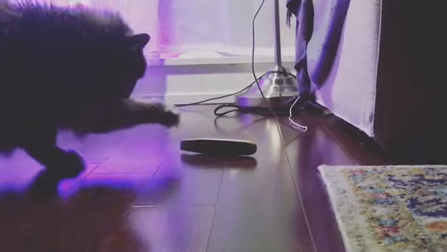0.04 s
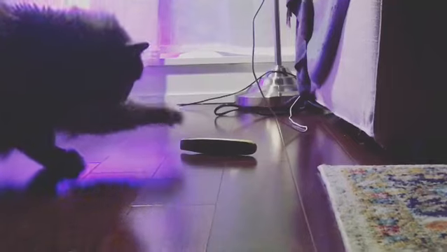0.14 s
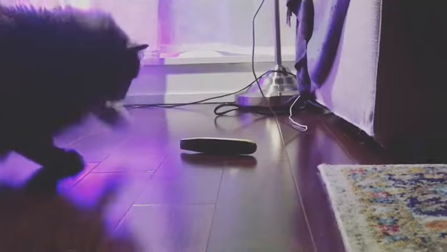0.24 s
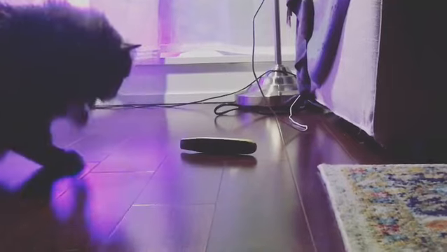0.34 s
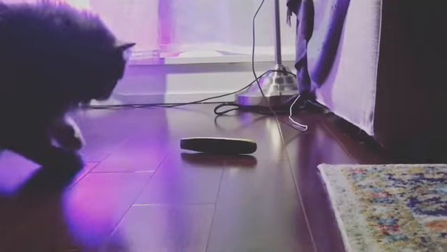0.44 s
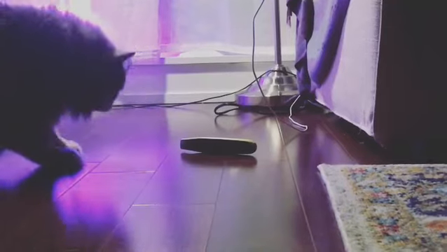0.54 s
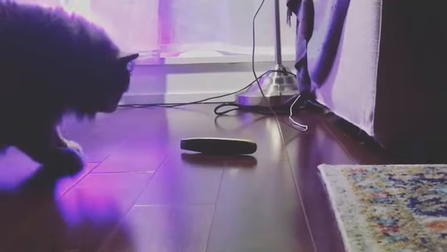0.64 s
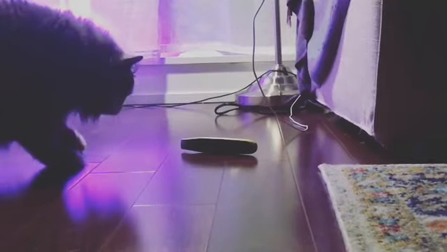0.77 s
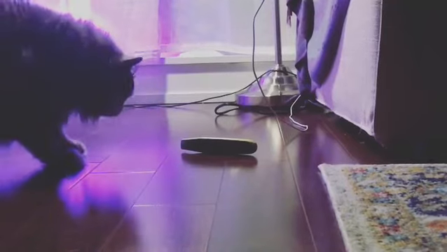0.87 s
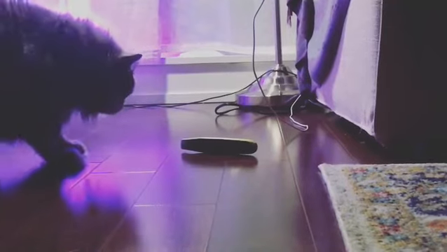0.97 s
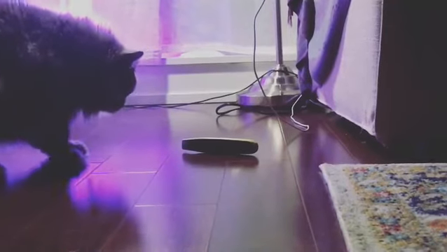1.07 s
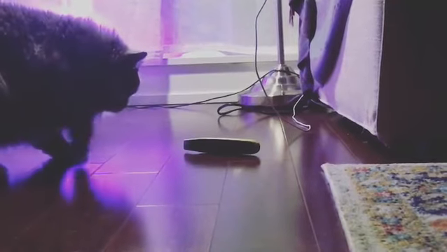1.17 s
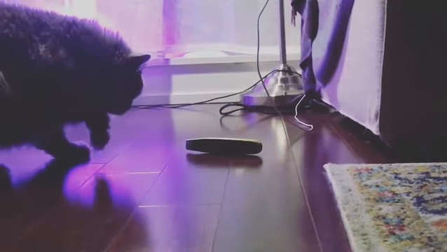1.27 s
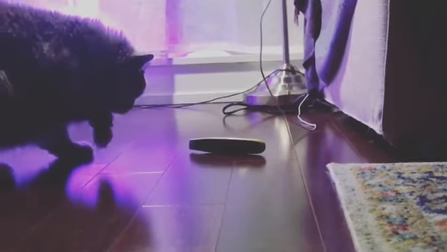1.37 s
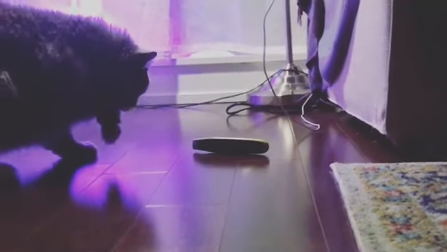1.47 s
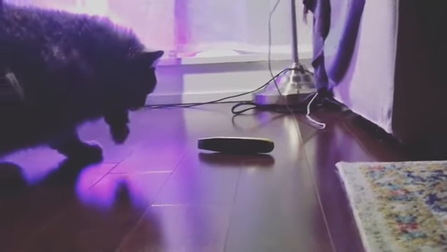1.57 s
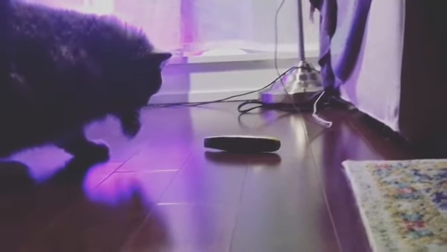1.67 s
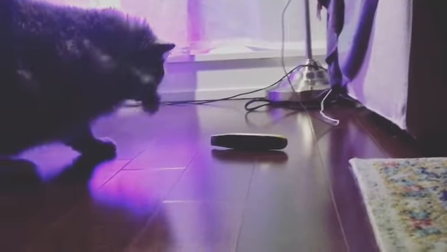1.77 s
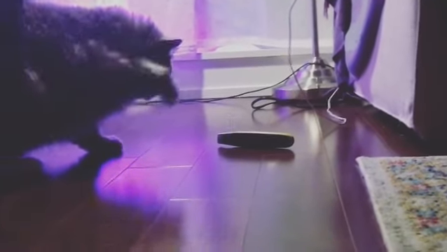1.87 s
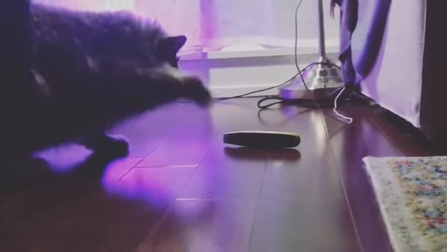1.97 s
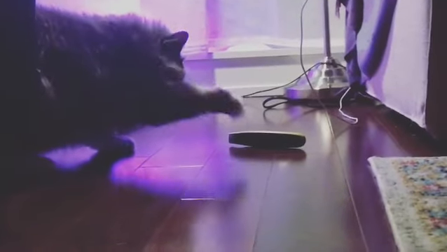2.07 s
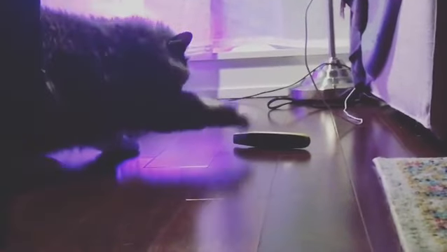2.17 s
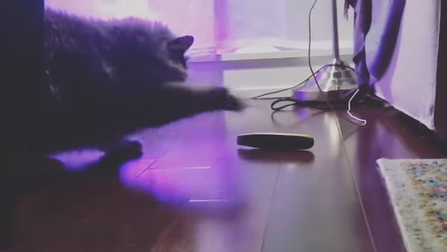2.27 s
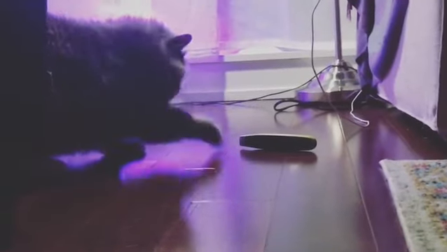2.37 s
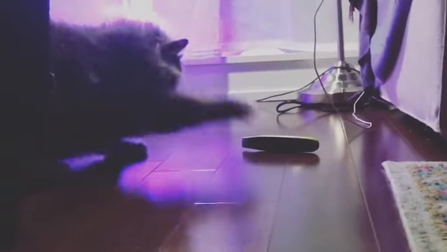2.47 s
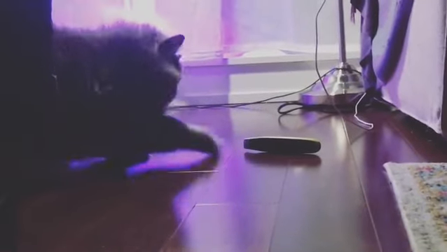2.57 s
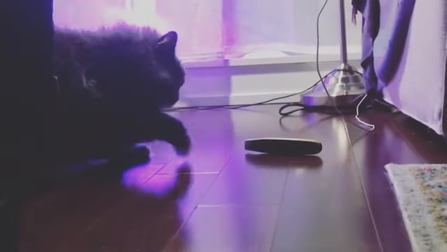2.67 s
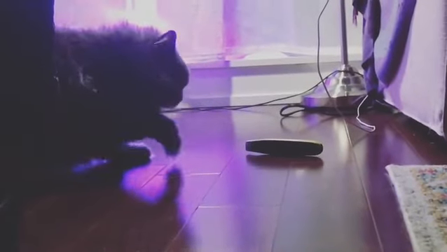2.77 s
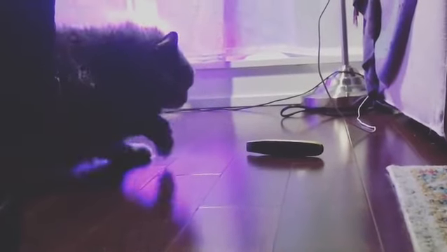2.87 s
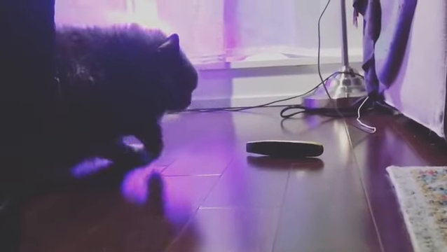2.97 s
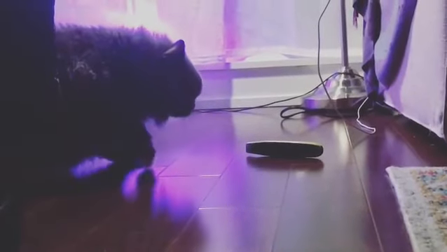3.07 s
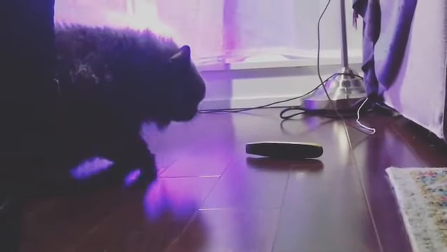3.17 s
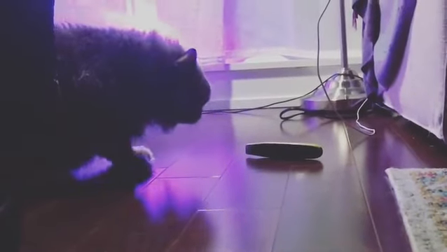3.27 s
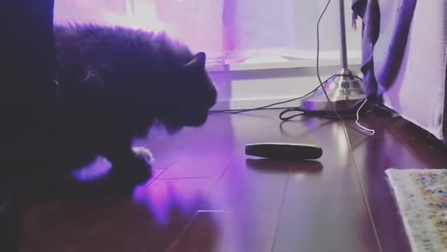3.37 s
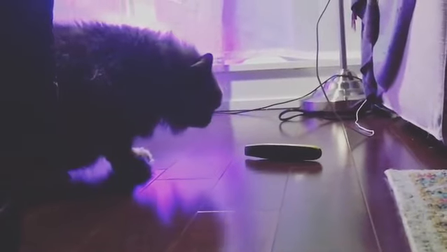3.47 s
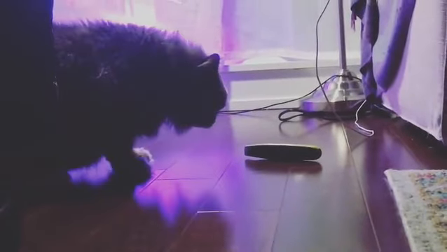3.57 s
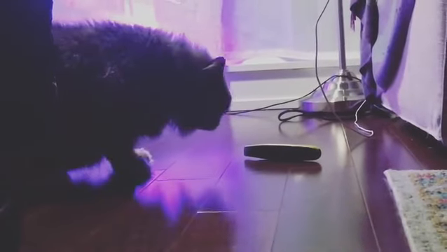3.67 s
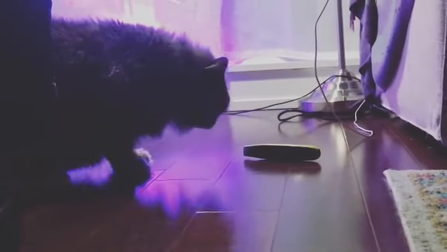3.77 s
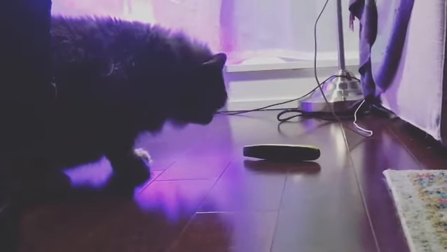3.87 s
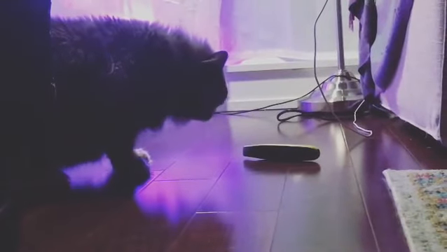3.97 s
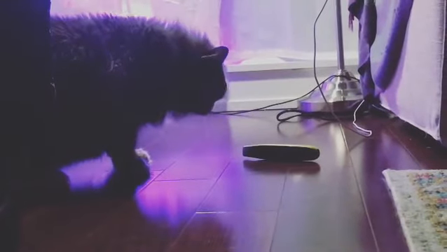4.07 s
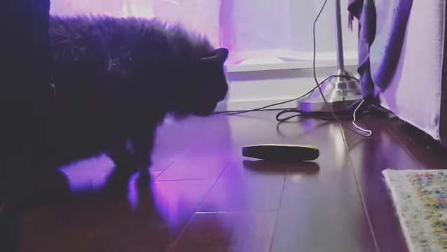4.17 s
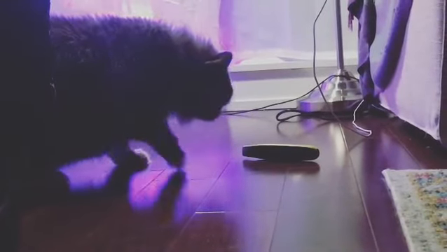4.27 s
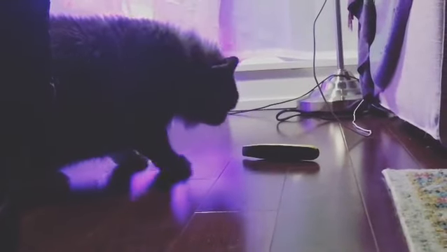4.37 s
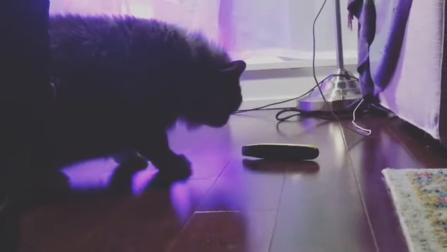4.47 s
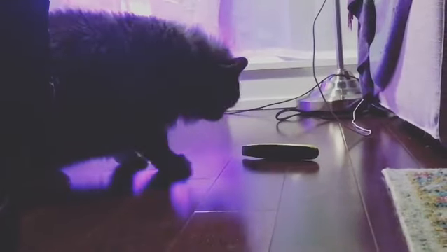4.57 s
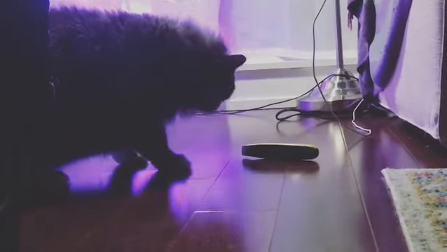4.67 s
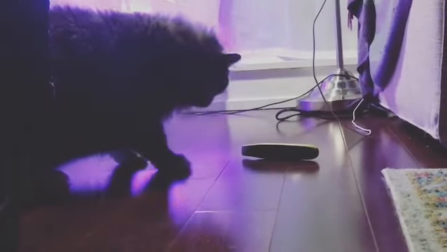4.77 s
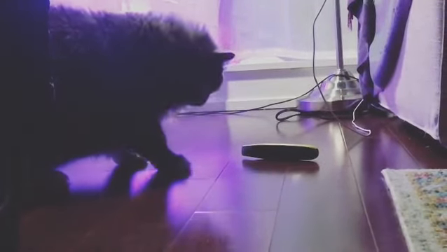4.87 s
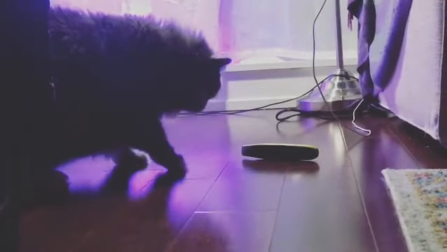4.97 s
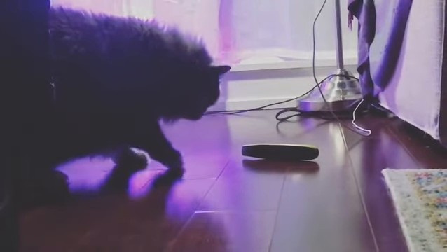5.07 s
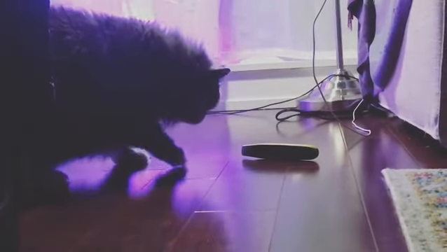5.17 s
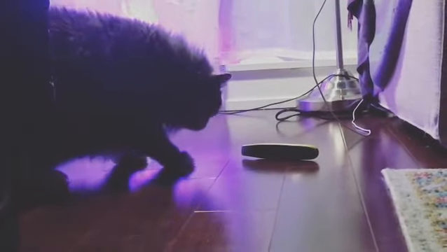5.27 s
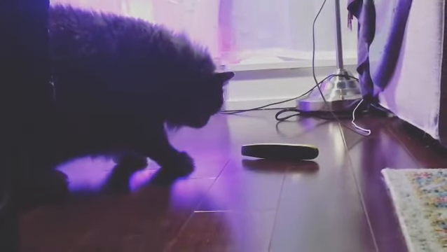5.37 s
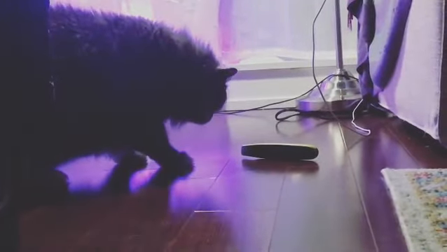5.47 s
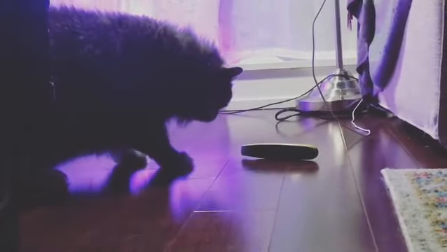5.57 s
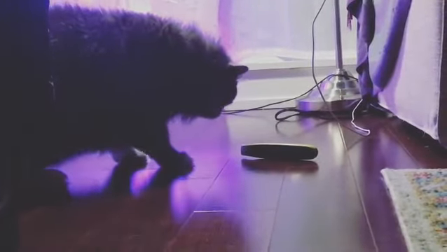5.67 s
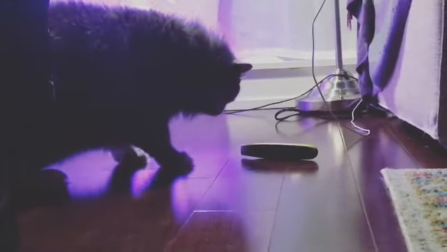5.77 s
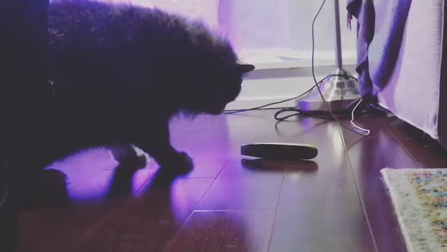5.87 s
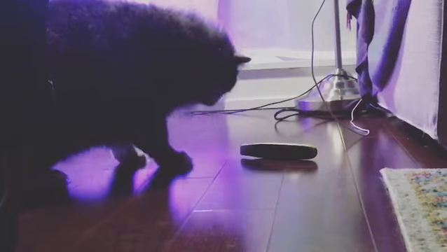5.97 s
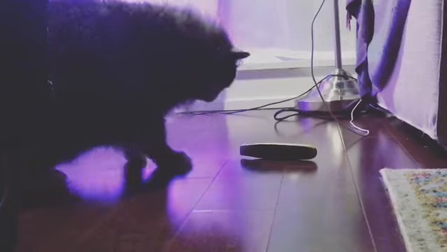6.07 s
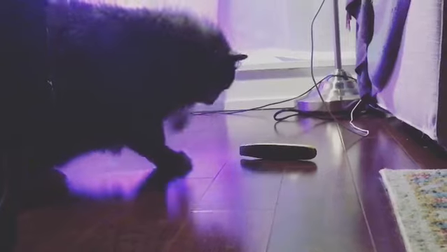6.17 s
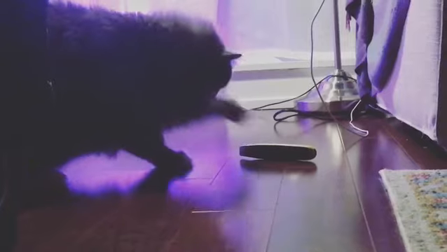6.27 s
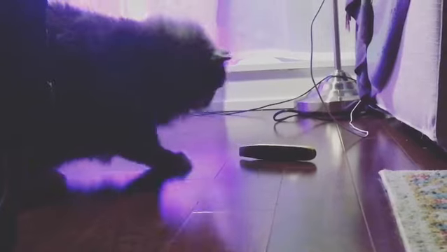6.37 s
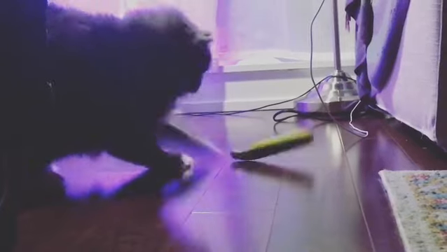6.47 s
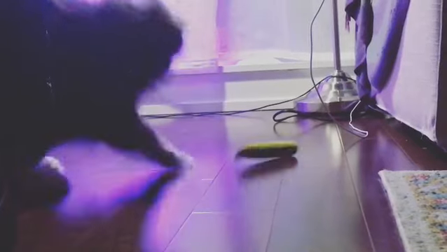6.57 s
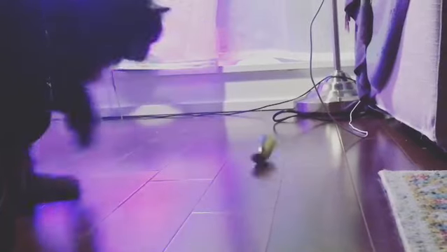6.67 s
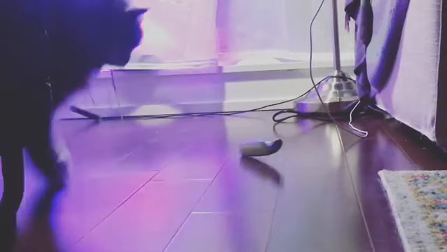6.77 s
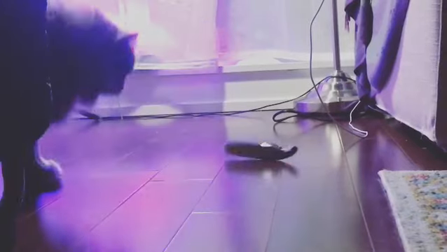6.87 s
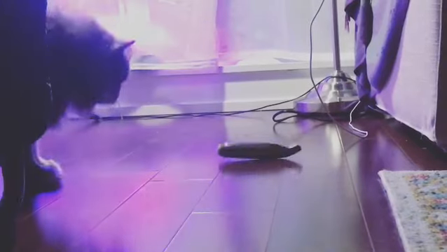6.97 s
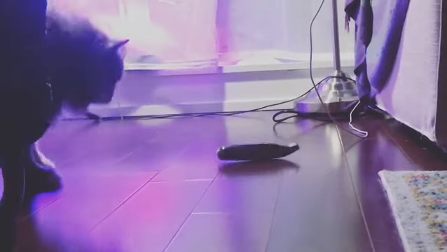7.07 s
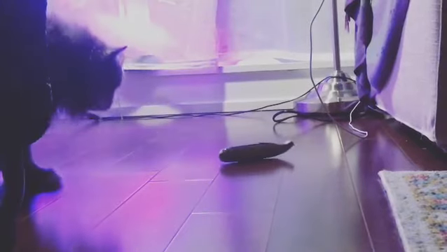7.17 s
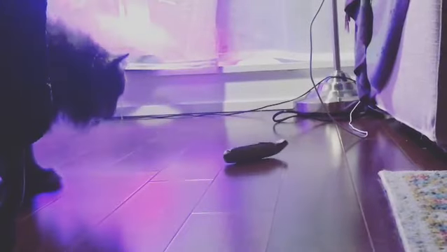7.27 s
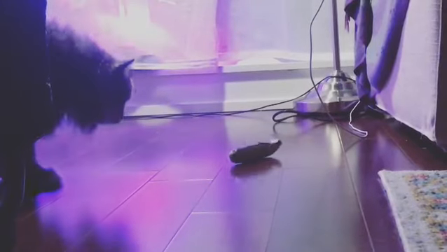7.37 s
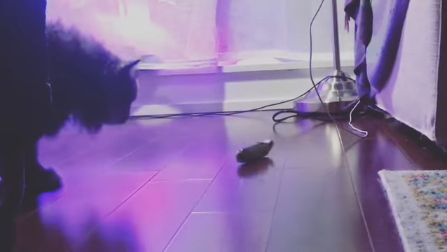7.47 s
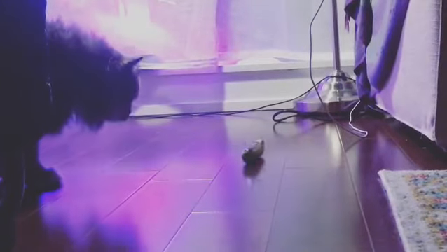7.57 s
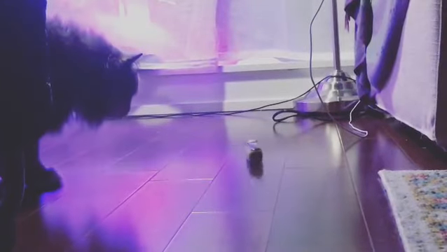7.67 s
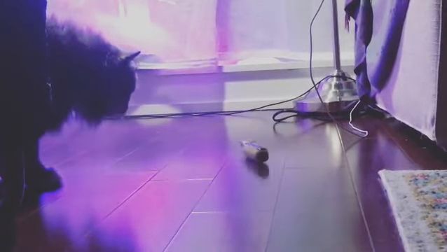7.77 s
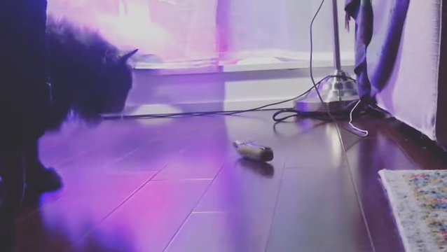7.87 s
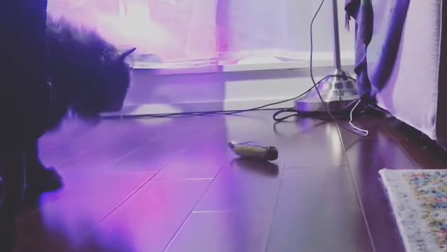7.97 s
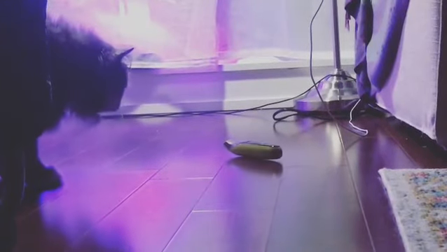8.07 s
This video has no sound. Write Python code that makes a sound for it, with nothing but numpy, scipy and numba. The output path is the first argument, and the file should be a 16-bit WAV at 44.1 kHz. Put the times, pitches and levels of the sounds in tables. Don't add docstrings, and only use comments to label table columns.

```python
import sys
import numpy as np
from scipy import signal
from scipy.fft import rfft, irfft
from scipy.io import wavfile
from scipy.ndimage import uniform_filter1d, minimum_filter1d
from numba import njit

SR = 44100
rng = np.random.default_rng(int(sys.argv[2]) if len(sys.argv) > 2 else 0)


def persist_wave(psi):
    counts = np.round(np.clip(psi, -1, 1) * 32767).astype(np.int16)
    wavfile.write(sys.argv[1], SR, np.atleast_2d(counts).T)


def magnitude_from_level(level_db):
    exponent = np.asarray(level_db, float) / 20
    return 10 ** exponent


N = 358523
TIME = np.arange(N) / SR
FREQ = np.fft.rfftfreq(N, 1 / SR)
GEAR_HZ = 39.915

STRONG_ORDERS = [6, 9, 18, 24, 27, 33, 39, 40, 42, 45, 48, 51, 55, 57, 58, 59, 60, 63, 66, 69, 72, 75, 78,
                 79, 81, 87, 90, 91, 97, 102, 105, 120, 126, 129, 136, 141, 145, 148, 159, 162, 165]
# (frequency [Hz], width [Hz], level [dB])
BOARD_MODES = [(234.6, 30, -15), (322.4, 25, -9), (397, 60, -7), (531, 105, 0), (648, 128, 0.5),
               (858, 135, -6), (1115, 174, -5.5)]


def level(x, db):
    return x * magnitude_from_level(db) / np.sqrt(np.mean(x ** 2))


def curves(table):
    s, *columns = np.transpose(table)
    return [np.interp(TIME, s, c) for c in columns]


def slope_db(points, hz):
    f, db = np.transpose(points)
    return np.interp(np.log(np.maximum(hz, 1)), np.log(f), db)


def colour(x, points):
    return irfft(rfft(x) * magnitude_from_level(slope_db(points, FREQ)), N)


def ring(x, modes):
    out = 0
    for k, (hz, width_hz, db) in enumerate(modes):
        gain = (-1) ** k * magnitude_from_level(db) * SR / (2 * np.pi * width_hz)
        out = out + gain * signal.lfilter(*signal.iirpeak(hz, hz / width_hz, SR), x)
    return out


def soften(x, hz):
    return signal.sosfilt(signal.butter(2, hz, fs=SR, output="sos"), x)


@njit
def sweep(x, hz, width_hz):
    y, b, l = np.empty(len(x)), 0., 0.
    for i in range(len(x)):
        g, k = np.tan(np.pi * hz[i] / SR), width_hz[i] / hz[i]
        v = (b + g * (x[i] - l)) / (1 + g * (g + k))
        b, l, y[i] = 2 * v - b, l + 2 * g * v, k * v
    return y


def walk(rate_hz):
    k = max(int(SR / rate_hz / 64), 1)
    steps = np.repeat(rng.standard_normal(N // 64 // k + 2), k)
    steps = uniform_filter1d(steps, k)
    return 1.28 * np.interp(np.arange(N) / 64, np.arange(len(steps)), steps)


def strikes(times_s, dbs):
    x = np.zeros(N)
    np.add.at(x, (np.asarray(times_s) * SR).astype(int), magnitude_from_level(dbs))
    return x


def home():
    # (frequency [Hz], density [dB per Hz])
    rumble_spectrum = [(13, -65), (22, -33), (37, -16.5), (58, -5.5), (80, 3), (113, -5), (438, -18),
                       (487, -26.5), (731, -18.5), (800, -74), (1040, -61), (1760, -120)]
    # (start [s], end [s], frequency [Hz], width [Hz], level [dB])
    drones = [
        (0, 0.495, 380, 17, -57.5),
        (0.948, 1.596, 280, 15, -60.5),
        (3.273, 4.198, 261.7, 3.4, -56),
        (6.673, 6.88, 229, 12, -44),
        (7.03, 7.495, 243, 8.7, -53),
    ]
    out = level(colour(rng.standard_normal(N), rumble_spectrum), -46.5) * magnitude_from_level(1.0 * walk(2.17))
    for start_s, end_s, hz, width_hz, db in drones:
        swell = np.clip(np.minimum(TIME - start_s, end_s - TIME) / 0.088, 0, 1)
        out = out + swell * level(ring(rng.standard_normal(N), [(hz, width_hz, 0)]), db)
    return out


def room(x):
    # (frequency [Hz], t60 [s], level [dB])
    decays = [(234, 0.98, -3), (670, 0.98, -4.5), (1300, 0.35, -6.5), (4100, 0.4, -5), (10100, 0.25, 1.5)]
    t = TIME[:SR]
    echo = 0
    for hz, t60_s, db in decays:
        band = signal.butter(2, [hz / 1.52, hz * 1.64], "band", fs=SR, output="sos")
        echo = echo + magnitude_from_level(db - 60 * t / t60_s) * signal.sosfilt(band, rng.standard_normal(SR))
    return signal.fftconvolve(x, echo * np.clip(t / 0.0016, 0, 1))[:N]


def paws():
    # (time [s], level [dB], decay [s], claw frequency [Hz])
    steps = [
        (1.948, -48, .03, 1500),
        (2.008, -55, 0.02, 900),
        (2.58, -45.5, 0.037, 2100),
        (2.64, -60, 0.022, 1500),
    ]
    noise = rng.standard_normal(N) * magnitude_from_level(2.1 * np.tanh(walk(150)))
    pad = level(ring(soften(noise, 500), BOARD_MODES), 0.5)
    pad = pad + level(ring(noise, [(180, 200, -4.5), (900, 520, 4)]), 1.5)
    out = 0
    for s, db, decay_s, claw_hz in steps:
        fade = np.exp(-np.maximum(TIME - s, 0) / decay_s) * (TIME > s)
        claw = level(ring(noise, [(claw_hz, 250, 0)]), 3.4)
        out = out + magnitude_from_level(db) * fade * (pad + claw)
    return out


def cracks(times_s, board_db, hard_db):
    top_hz = np.clip(4430 * 2 ** (hard_db / 26.5), 2000, 16000)
    out = np.zeros(N)
    for start, db, hz in zip((times_s * SR).astype(int), board_db + hard_db, top_hz):
        burst = rng.standard_normal(200) * np.exp(-np.arange(200) / (0.00049 * SR))
        band = signal.butter(2, [max(1100, 0.3 * hz), hz], "band", fs=SR, output="sos")
        burst = signal.sosfilt(band, burst)
        out[start:start + 200] += magnitude_from_level(db) * burst / np.abs(burst).max()
    return out


def skid(shell_modes):
    # (time [s], level [dB], t60 [s])
    slides = [
        (6.548, -24, 0.12),
        (6.6, -16, 0.098),
        (6.661, -14, 0.13),
        (6.73, -28, 0.96),
        (7.0, -31.5, 1.1),
    ]
    hail = (rng.random(N) < 200 / SR) * np.tanh(rng.standard_normal(N)) * magnitude_from_level(0.84 * rng.exponential(size=N))
    grit = (rng.random(N) < 1500 / SR) * rng.standard_normal(N)
    slow = np.clip((TIME - 6.92) / 0.25, 0, 1)
    blows = soften(hail, 820) * (1 - slow) + magnitude_from_level(5) * slow * soften(hail, 330)
    sliding = 0
    for s, db, t60_s in slides:
        attack = np.clip((TIME - s) / 0.0063, 0, 1)
        sliding = sliding + magnitude_from_level(db - 60 * np.maximum(TIME - s, 0) / t60_s) * attack
    return (level(ring(blows, BOARD_MODES), -11.0) + level(ring(grit, shell_modes), -17)) * sliding


def clatter():
    # (time [s], strength [dB], hardness: crack over thud [dB])
    knocks = [(6.5421, -37, 27), (6.5443, -46, 18), (6.549, -35, -3), (6.555, -38, -4), (6.594, -34, -7),
              (6.603, -29, -8), (6.671, -27, 4), (6.6728, -12.5, -3), (6.6746, -13, 4), (6.6757, -22, 9),
              (6.6772, -18, -3), (6.684, -24, -4), (6.693, -32, -2.5), (6.7382, -30, 12), (6.7516, -22, -1),
              (6.7555, -20, -3), (6.760, -19.5, -3), (6.774, -28, -9), (6.786, -22, -24), (6.812, -34, -11),
              (6.849, -19, -6), (6.880, -28, -17), (6.927, -34, -15), (6.999, -26, -9), (7.038, -28, -4),
              (7.047, -24, -5), (7.095, -35, -12), (7.15, -30.5, -18), (7.21, -38, -12)]
    # (frequency [Hz], width [Hz], level [dB])
    shell_modes = [(1510, 470, 4), (2280, 390, -5), (2840, 350, 1), (4100, 440, -7), (5530, 2200, 0)]
    s, board_db, hard_db = np.transpose(knocks)
    shell_db = board_db - 1.9 + np.minimum(hard_db, 12)
    shell = ring(soften(strikes(s, shell_db), 3300), shell_modes)
    rebound_s = s + 0.003 * (1 + rng.standard_normal(len(s)) ** 2)
    blows = strikes(s, board_db) - strikes(rebound_s, board_db - 5)
    boards = ring(soften(blows, 1020), BOARD_MODES)
    return shell + cracks(s, board_db, hard_db) + boards + skid(shell_modes)


def comb(turns, motor_db, scatter_db):
    # (frequency [Hz], mean level [dB])
    weak_spectrum = [(700, -83), (1100, -85.5), (1600, -82), (2000, -85), (2500, -73.5), (4200, -78),
                     (5000, -86.5), (6500, -77), (7100, -96), (9500, -87), (12000, -97), (14000, -100)]
    k = np.arange(1, 351)
    size, phase = rng.standard_normal((2, 350))
    db = slope_db(weak_spectrum, k * GEAR_HZ) + motor_db * (k % 3 == 0) + scatter_db * np.minimum(size, 1)
    db[np.array(STRONG_ORDERS) - 1] = -150
    lines = np.zeros(8193, complex)
    lines[k] = magnitude_from_level(db) * np.exp(100j * phase) * 8192 * np.sqrt(2)
    one_turn = np.resize(irfft(lines), 16385)
    return np.interp(turns % 1 * 16384, np.arange(16385), one_turn)


def gear_lines(turns, turned, unrest):
    lying_lines = [-68, -71, -70, -68, -57, -65, -58, -57, -65, -65, -59, -56, -63, -54, -65, -63, -59, -64,
                   -64, -66, -61, -57, -85, -65, -69, -70, -66, -66, -62, -69, -66, -69, -67, -69, -71, -88,
                   -71, -68, -68, -71, -70]
    turned_lines = [-61, -64, -66, -70, -71, -70, -61, -85, -60, -68, -78, -72, -76, -58, -73, -75, -62,
                    -69, -68, -69, -66, -70, -61, -85, -64, -63, -66, -85, -69, -66, -67, -67, -81, -71,
                    -88, -67, -77, -85, -72, -76, -76]
    out = 0
    for k, lying_db, turned_db in zip(STRONG_ORDERS, lying_lines, turned_lines):
        db = lying_db + (turned_db - lying_db) * turned + 0.96 * walk(7)
        db = db + 5 * unrest * np.minimum(walk(9), 0.4)
        out = out + magnitude_from_level(db) * np.sqrt(2) * np.sin(2 * np.pi * (k * turns + rng.random()))
    return out


def blade_hiss(turns):
    # (frequency [Hz], density [dB per Hz])
    hiss_spectrum = [(450, -28), (650, -5), (800, -17.5), (1050, -11), (1230, -12), (1650, -6),
                     (2050, -8.5), (2320, 3), (2700, -6), (3000, 0.5), (3500, -4.5), (4050, 3),
                     (4500, -8.5), (6050, -7.5), (6650, -7), (7100, -13), (14000, -17.5)]
    stroke = 0.6 + np.exp(-(3 * turns % 1) / 0.094)
    noise = rng.standard_normal(N) * stroke * magnitude_from_level(0.95 * walk(14))
    return level(colour(noise, hiss_spectrum), -48.5)


def floor_dips():
    # (frequency [Hz], width [Hz], level [dB])
    dips = [(4000, 140, -9), (6260, 74, -5.5), (7660, 960, -3), (9140, 490, -5.5), (10280, 800, -3.5),
            (12100, 390, -9), (13700, 500, -1.5)]
    return magnitude_from_level(sum(db * np.exp(-(2 * (FREQ - hz) / width_hz) ** 2) for hz, width_hz, db in dips))


def facing(spectrum, quarters, unrest, swatted):
    # (lying [dB], side-on [dB], end-on [dB], shaken [dB])
    bands = [
        (5.5, 4.5, 4.5, -2),
        (0.2, 2.5, -2, -2.3),
        (1.5, -1.5, -2, 3),
        (3.5, 1, -0.5, 4),
    ]
    edges = [2000, 4400, 7000]
    end_on = np.sin(np.pi / 2 * quarters) ** 2
    band = np.searchsorted(edges, FREQ)
    out = 0
    for k, (lying_db, side_db, end_db, shaken_db) in enumerate(bands):
        spun_db = side_db + (end_db - side_db) * end_on + shaken_db * unrest
        out = out + magnitude_from_level(lying_db + (spun_db - lying_db) * swatted) * irfft(spectrum * (band == k), N)
    return out


def head_lobe(x):
    # (time [s], frequency [Hz], level [dB])
    path = [(6.8, 3000, -44), (6.9, 3520, 4), (7.0, 3320, 5.5), (7.1, 4150, -23), (7.2, 4570, 0),
            (7.32, 6030, -1), (7.55, 5800, 2), (7.8, 5000, -13), (8.05, 5060, 2.5)]
    lobe_hz, lobe_db = curves(path)
    return magnitude_from_level(lobe_db) * sweep(x, lobe_hz, 0.29 * lobe_hz)


def shaver():
    # (time [s], turn [quarter turns], unrest [0-1])
    spin = [
        (6.53, 0, 0),
        (6.6, .3, .7),
        (6.8, 1.0, .99),
        (7.05, 1.9, .99),
        (7.35, 2.3, .65),
        (7.6, 2.7, .25),
        (7.87, 3.0, .15),
        (8.13, 3.8, .05),
    ]
    quarters, unrest = curves(spin)
    swatted = np.clip((TIME - 6.53) / 0.05, 0, 1)
    turned = swatted * np.clip(1 - 0.12 * unrest, 0, 1)
    turns = GEAR_HZ * TIME + 0.0038 * walk(1.5) + 0.00026 * walk(25)
    lines_gain = magnitude_from_level(-0.08 - 2 * unrest)
    strong = gear_lines(turns, turned, unrest)
    weak_lying = comb(turns, motor_db=1.5, scatter_db=9.5)
    weak_turned = comb(turns, motor_db=7.0, scatter_db=12.0) * magnitude_from_level(-4.5)
    weak = (1 - turned) * weak_lying + turned * weak_turned
    spectrum = rfft(blade_hiss(turns) + weak * lines_gain) * floor_dips()
    body = facing(spectrum, quarters, unrest, swatted)
    return body + head_lobe(body) + strong * lines_gain


def scene():
    blows = clatter() + paws()
    return (shaver() + blows + magnitude_from_level(-33.0) * room(blows) + home())[None]


def roll_off(x):
    return signal.sosfilt(signal.butter(12, 14950, fs=SR, output="sos"), x)


def record(dry):
    x = signal.sosfilt(signal.butter(16, 14400, fs=SR, output="sos"), dry[0])
    hz, s, cells = signal.stft(x, SR, nperseg=2048)
    band = np.minimum(hz / 300, 44).astype(int)
    wander = rng.standard_normal((band.max() + 1, len(s)))
    wander_db = 7.4 * uniform_filter1d(wander, size=3, axis=1)[band]
    power = np.abs(cells) ** 2
    around = minimum_filter1d(uniform_filter1d(power, size=80, axis=0), size=3, axis=1)
    under_db = np.interp(hz, [2500, 4540, 6760, 12500, 13500], [-20, -11.5, -4.5, -4.5, 3.0])[:, None]
    faint = uniform_filter1d(power, size=3, axis=0) < around * magnitude_from_level(under_db + wander_db) ** 2
    total = power.sum(axis=0)
    steady = total < magnitude_from_level(30) * np.median(total)
    cells[faint & steady | (hz > 13980)[:, None]] = 0
    mix = signal.istft(cells, SR, nperseg=2048)[1][None, :N]
    return roll_off(mix)


dry = scene()
out = record(dry)
persist_wave(out)
```